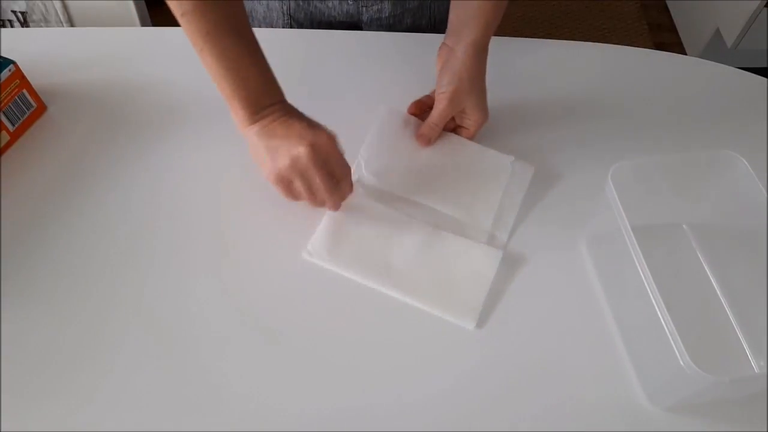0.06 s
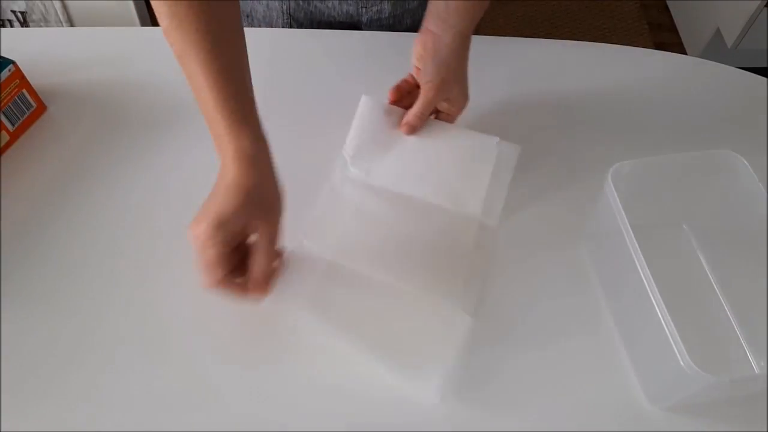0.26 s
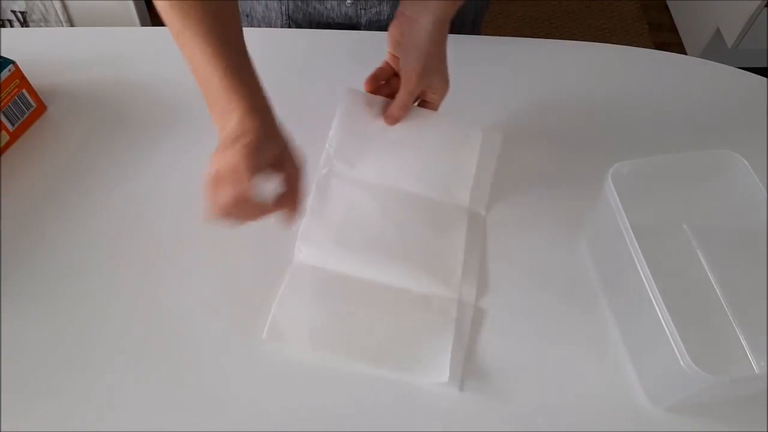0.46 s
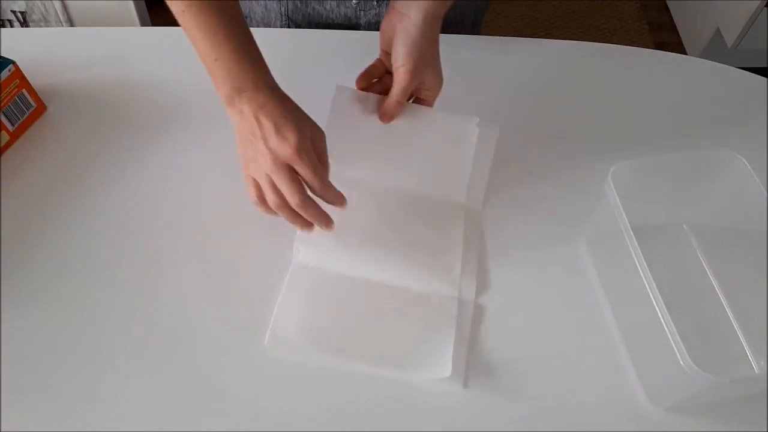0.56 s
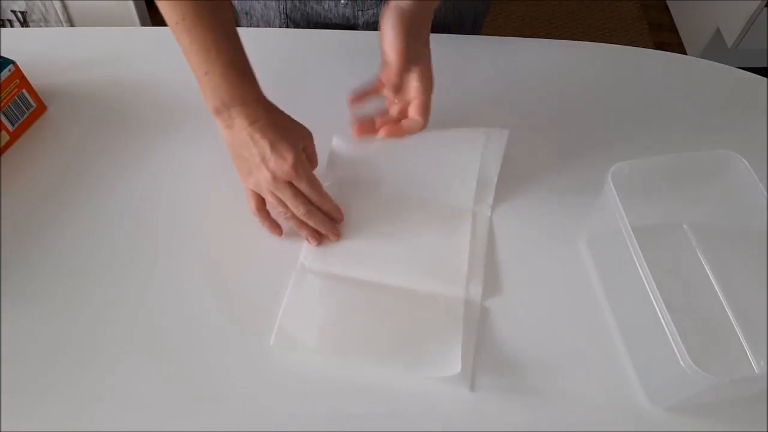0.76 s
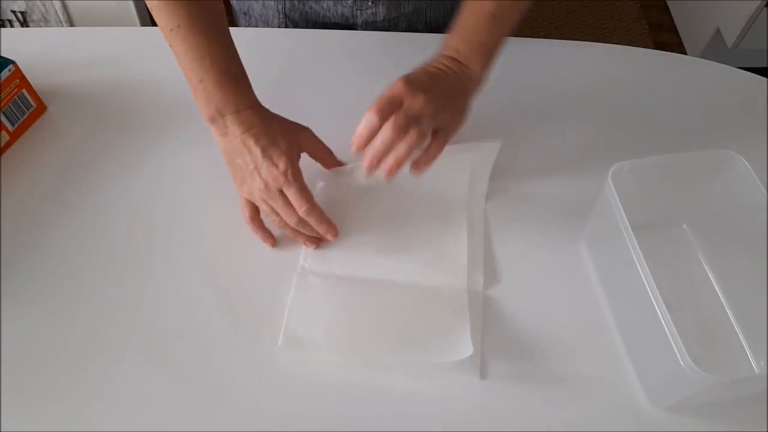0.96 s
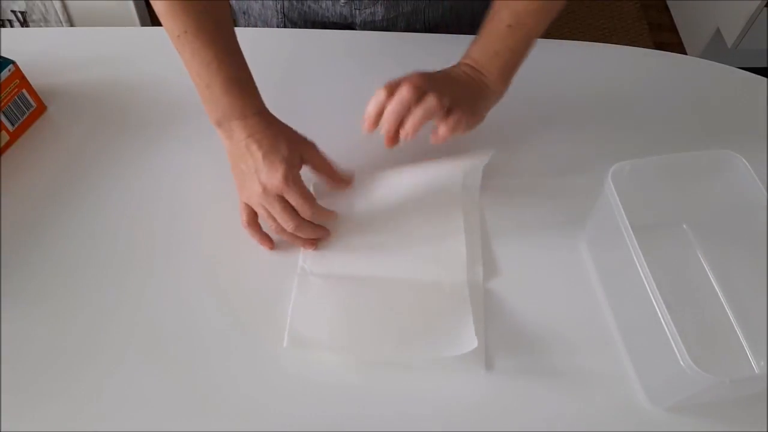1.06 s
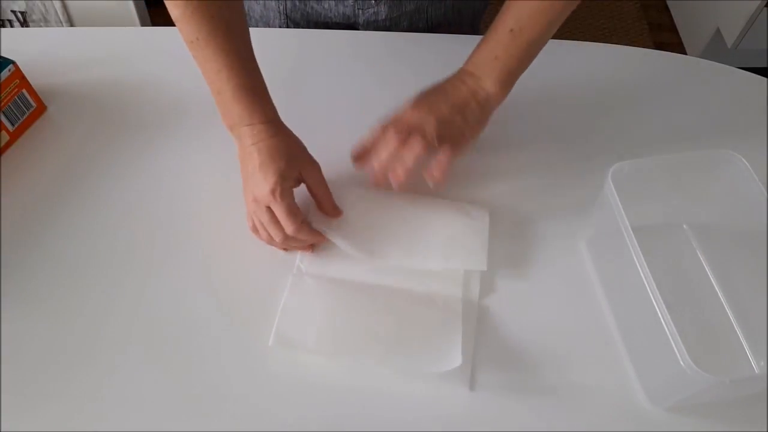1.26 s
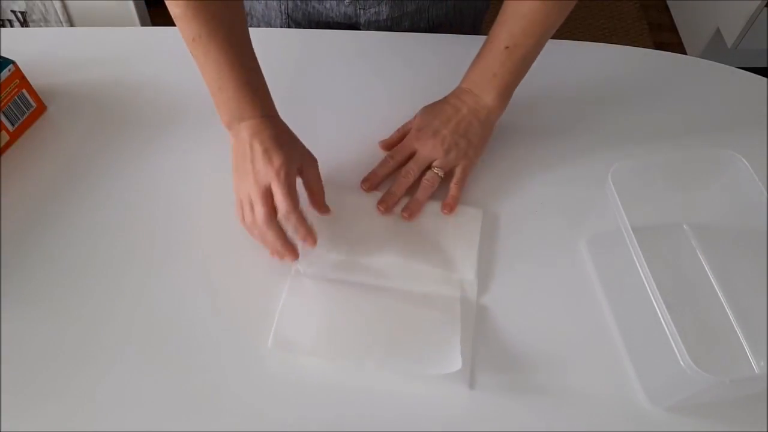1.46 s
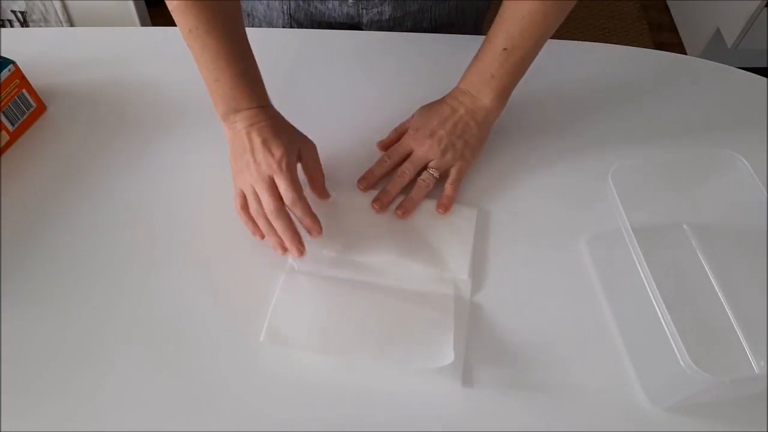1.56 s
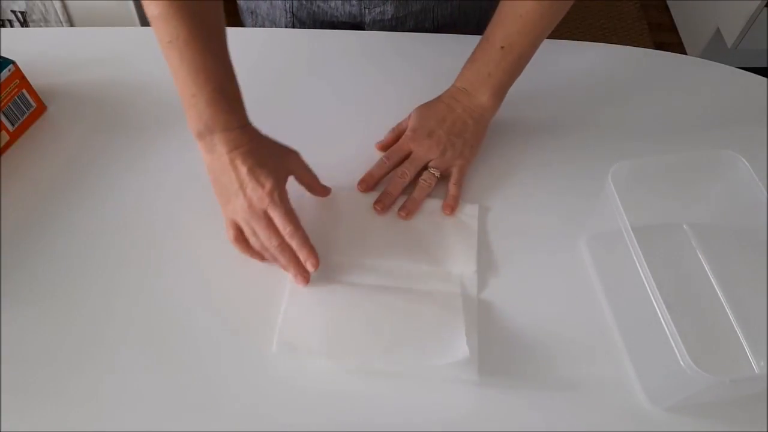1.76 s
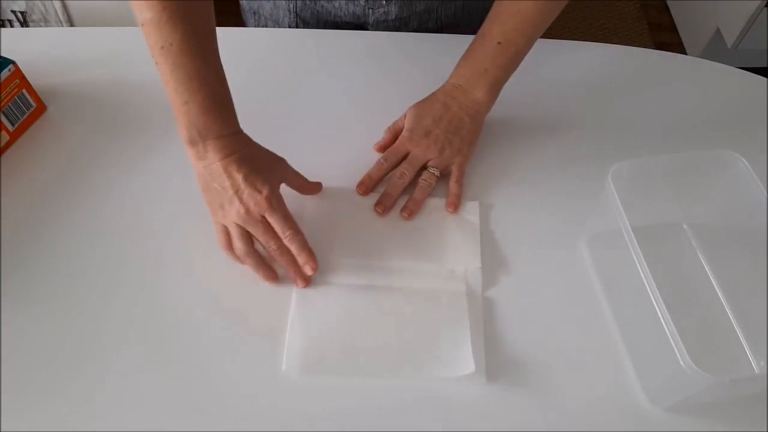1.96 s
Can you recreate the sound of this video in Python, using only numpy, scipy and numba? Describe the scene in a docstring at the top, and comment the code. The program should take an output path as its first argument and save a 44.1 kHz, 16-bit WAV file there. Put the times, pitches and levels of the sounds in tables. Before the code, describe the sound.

Stiff baking paper is handled on a table, close up in a small hard room. Faint crackle begins, with a crisp rustle and sharp ticks at 0.2 s. At 0.43 s the sheet snaps with one loud, dry pop and a short tail. After a lull, rustling resumes at 0.66 s, with creasing ticks, a light swish near 1.25 s and smoothing, thinning out by 2 s. Low hum and faint hiss continue beneath.

```python
"""Handling of stiff baking paper

Hands fold and smooth a sheet on a table, under a phone with two microphone ports.
Dense micro-buckles, drawn as random clicks, excite the sheet's broad, shifting resonance.
Single creases tick as noise bursts, a sliding flap swishes, and the sheet pops once as a sum of decaying modes;
one more noise burst is the pop's echo.
A small hard room answers with a diffuse noise tail, over filtered noise: a low hum in the room's modes and a hiss."""
import sys
import numpy as np
from scipy import signal
from scipy.fft import rfft, irfft
from scipy.io import wavfile
from scipy.ndimage import uniform_filter1d
from numba import njit

SR = 44100
rng = np.random.default_rng(int(sys.argv[2]) if len(sys.argv) > 2 else 0)


def ratio_of_db(decibels):
    """Turn decibels (scalar or array-like) into linear amplitude factors; 0 dB maps to 1."""
    return 10 ** (np.asarray(decibels, float) / 20)


def waveform_to_disk(signal):
    """Save audio, clipped to [-1, 1], as 16-bit WAV at the path in sys.argv[1]."""
    frames = np.transpose(np.atleast_2d(signal))
    scaled = np.clip(frames, -1, 1) * 32767
    samples = np.round(scaled).astype(np.int16)
    wavfile.write(sys.argv[1], SR, samples)


N = 88200

# Handling of the sheet before and after the pop:
# (time [s], level of the sheet's body [dB], resonance of the bent sheet [Hz],
#  crispness relative to the body [dB], free flap relative to the body [dB])
HANDLING_BEFORE_POP = [(0.0, -61.5, 2660, 6.5, -12), (0.049, -55, 2330, -3, -6),
                       (0.128, -65.5, 3070, 1.5, -11), (0.194, -53.5, 2800, 0, -7),
                       (0.201, -36.5, 2650, -4, -11), (0.222, -46.5, 2360, 1.5, -9),
                       (0.328, -51, 1920, -2, -8), (0.338, -43.5, 2050, -1.5, -5.5),
                       (0.415, -51, 2020, -4.5, -20)]
HANDLING_AFTER_POP = [(0.655, -87, 2210, -13, -3), (0.662, -41.5, 2220, -5, -8.5),
                      (0.703, -42.5, 2250, -7, -9.5), (0.727, -37.5, 2100, -5, -13.5),
                      (0.795, -44.5, 2480, -6, -12.5), (0.82, -53.5, 2520, 0.5, -4.5),
                      (0.91, -49, 1900, -10, -10), (0.953, -46.5, 2100, -5, -9),
                      (1.012, -56.5, 1930, -3, -3.5), (1.021, -44.5, 2140, -4.5, -5),
                      (1.059, -48, 2620, -7.5, -11), (1.119, -54.5, 2570, -8, -11),
                      (1.13, -44, 2060, -5, -3.5), (1.152, -46.5, 1620, -3.5, -7),
                      (1.16, -39.5, 1510, -6, -0.5), (1.18, -50, 1600, -4.5, -3),
                      (1.2, -40.5, 2400, -15, -20), (1.231, -40, 2490, -11, -18),
                      (1.288, -42.5, 2270, -8, -10), (1.326, -55.5, 1970, -3, -14),
                      (1.375, -53.5, 2200, 1.5, -7), (1.379, -45, 2570, 4.5, -4),
                      (1.393, -44, 1870, -6, -8.5), (1.441, -40, 2360, -7, -15.5),
                      (1.489, -55.5, 2550, 1, -13), (1.545, -44, 2370, -14, -32),
                      (1.585, -42.5, 2340, -16.5, -34), (1.625, -59, 2500, -4, -17),
                      (1.665, -69, 2700, 0, -17), (1.691, -41.5, 2570, -9.5, -19.5),
                      (1.733, -47, 2070, -10, -15.5), (1.882, -70.5, 2370, -1.5, -11),
                      (1.925, -49.5, 2420, -13, -27), (1.953, -62, 2430, 3.5, -15),
                      (2.0, -62, 2660, -9, -12)]
# Broad body around the resonance: (frequency [Hz], relative level [dB])
BROAD_BODY = [(900, -15), (1500, 3.5), (2200, 10), (4000, 9), (6500, -9.5), (10000, -9.5), (16000, -49)]
# Treble of crisp paper: (frequency [Hz], relative level [dB])
CRISP_TREBLE = [(2500, -15), (4500, 13), (6000, 10), (8000, 12.5), (10000, 6.5), (12500, 8), (15000, 0),
                (16500, -22)]
# Rustle from far corners, unlike at the two ports: (frequency [Hz], gain [dB])
CORNER_GAIN = [(1500, -7), (5000, 0)]
# Modes of the sheet as it snaps through: (frequency [Hz], relative level [dB], decay by 60 dB [s])
SNAP_MODES = [(1020, -16, 0.017), (1755, -14.5, 0.0057), (2160, -11.5, 0.021), (3360, -11.5, 0.0032),
              (5000, -26, 0.00089), (8000, -32, 0.001), (10400, -8, 0.0012)]
# Creases that snap, and the pop's echo at 0.4335 s: (time [s], level of the ring's peak [dB], pitch [Hz])
TICK_BURSTS = [(0.0504, -35, 8000), (0.0727, -31, 6900), (0.1564, -28.5, 10000), (0.2005, -21.5, 9100),
               (0.199, -32, 3700), (0.205, -18.5, 8550), (.2050, -17, 12300), (.2060, -16, 11100),
               (0.339, -30, 6800), (.372, -33, 9500), (.4335, -20, 1450), (.684, -30, 10000),
               (0.71, -30, 9100), (0.741, -32, 7200), (.8545, -41, 11000), (0.9557, -28.5, 7960),
               (1.131, -35, 6700), (1.156, -30.5, 4060), (1.2481, -23.5, 11600), (1.3637, -31, 9500),
               (1.3775, -29, 4100), (1.4458, -27, 3430), (1.515, -30, 6000), (1.525, -30, 4360),
               (1.6274, -35, 6000), (1.6829, -28, 8300), (1.688, -34.5, 4500), (1.8010, -37.5, 7200),
               (1.9211, -31, 2160), (1.923, -33, 5000)]
# Balance as the work moves over the table: (time [s], left minus right [dB])
TABLE_PAN = [(0, 0.5), (1.2, 1), (2, 1.5)]
# Reverberation time of the room: (frequency [Hz], decay by 60 dB [s])
REVERBERATION = [(200, 0.81), (1000, 0.33), (2500, 0.52), (6000, 0.16), (14000, 0.27)]
# Room modes that carry the hum: (frequency [Hz], bandwidth [Hz], relative density [dB per Hz])
HUM_MODES = [(71, 9.3, -3), (98.3, 14.5, -1.5), (115.2, 7.2, 4), (147.6, 30.4, 1.5), (225.4, 19.8, -4.5),
             (289, 22.4, -16.5), (356.7, 27, -15)]
# Spectrum of the room noise: (frequency [Hz], relative density [dB per Hz])
AIR_SPECTRUM = [(20, -9), (45, -12), (100, -5), (300, -5), (600, -15.5), (1500, -37), (4000, -23.5),
                (9000, -30), (16000, -58)]

POP_S = 0.4253
HELD_LOW_HZ = 1450  # paper pressed to the table is quiet below this


def level(x, db):
    """Normalization: the rms value of x is set to db."""
    return x * ratio_of_db(db) / np.sqrt(np.mean(x ** 2))


def highpass(x, order, hz):
    """Butterworth response: maximally flat above the cutoff."""
    return signal.sosfilt(signal.butter(order, hz, "high", fs=SR, output="sos"), x)


def colour(x, points):
    """Linear filtering: the spectrum is multiplied by a curve of (Hz, dB), straight over log frequency."""
    hz, db = np.array(points, float).T
    f = np.maximum(np.fft.rfftfreq(x.shape[-1], 1 / SR), 1)
    gain = ratio_of_db(np.interp(np.log(f), np.log(hz), db))
    return irfft(rfft(x) * gain, x.shape[-1])


@njit
def svf(x, hz, width):
    """State-variable resonator: a band-pass with a moving centre; width is a share of the centre."""
    y, b, l = np.empty(len(x)), 0., 0.
    for i in range(len(x)):
        g = np.tan(np.pi * hz[i] / SR)
        v = (b + g * (x[i] - l)) / (1 + g * (g + width))
        b, l, y[i] = 2 * v - b, l + 2 * g * v, width * v
    return y


def resonate(x, hz, width):
    """Cascaded resonance: two equal band-passes in series, each of the given width."""
    centre = np.full(len(x), hz, float)
    return svf(svf(x, centre, width), centre, width)


def walk(rate):
    """Slow random modulation: levels held for 1 / rate seconds and slewed, with a spread near 1."""
    hold = int(SR / rate)
    steps = np.repeat(rng.standard_normal(N // hold + 1), hold)
    return 1.3 * uniform_filter1d(uniform_filter1d(steps, hold), hold)[:N]


def buckles():
    """Impulsive excitation: micro-buckles are random clicks of uneven size, in flurries over fine noise."""
    per_s, mean_db, top_db = 4000, 3.2, 13
    flutter_db, flutter_per_s = 2.5, 140
    hit = rng.random(N) < per_s / SR
    size_db = np.minimum(mean_db * rng.exponential(size=N), top_db)
    sign = np.sign(rng.standard_normal(N))
    grains = hit * ratio_of_db(size_db) * sign + 0.28 * rng.standard_normal(N)
    return grains * ratio_of_db(flutter_db * walk(flutter_per_s))


def rustle():
    """Forced resonance: buckles ring the bent sheet; crisp paper adds treble, loose paper a lower flap."""
    sheet_width, broad_db = 0.93, -9
    panel_width, panel_drift, panel_db = 0.09, 0.15, -3
    flap_hz, flap_width = 1154, 1.0  # low ring of the sheet where no hand holds it down
    settle_db, settle_t60_s = -37.5, 0.42
    t = np.arange(N) / SR
    s, db, hz, crisp_db, flap_db = np.array(HANDLING_BEFORE_POP + HANDLING_AFTER_POP, float).T
    centre = np.clip(np.interp(t, s, hz), 300, 8000)
    clicks = buckles()

    ring = resonate(clicks, centre, sheet_width) / np.sqrt(centre)
    body = level(ring, 0) + level(colour(buckles(), BROAD_BODY), broad_db)
    panels = np.zeros(N)
    for share in (0.866, 1.168):  # pitch of each small panel as a share of the resonance
        panel_hz = share * centre * np.exp(panel_drift * walk(29.89))
        panels += svf(clicks, panel_hz, panel_width)
    body = level(highpass(body + level(panels, panel_db), 4, HELD_LOW_HZ), 0)

    top = level(colour(clicks + buckles(), CRISP_TREBLE), 0) * ratio_of_db(np.interp(t, s, crisp_db))
    flap = level(resonate(clicks, flap_hz, flap_width), 0) * ratio_of_db(np.interp(t, s, flap_db))

    # between the two spells of handling the sheet shivers out after the pop
    last_s, last_db = HANDLING_BEFORE_POP[-1][:2]
    let_go = (t > last_s) & (t < HANDLING_AFTER_POP[0][0])
    shiver_db = np.where(t > POP_S, settle_db - 60 * (t - POP_S) / settle_t60_s, last_db)
    return (body + top + flap) * ratio_of_db(np.where(let_go, shiver_db, np.interp(t, s, db)))


def snap_ring(t):
    """Modal superposition: a short push swells up to t = 0, then each mode decays exponentially."""
    push_s = 0.00007
    u = np.maximum(t, 0)
    modes = np.zeros(len(t))
    for hz, db, t60 in SNAP_MODES:
        modes += ratio_of_db(db) * np.cos(2 * np.pi * hz * u) * np.exp(-np.log(1000) * u / t60)
    return modes * np.exp(-0.5 * (np.minimum(t, 0) / push_s) ** 2)


def pop():
    """Snap-through instability: the sheet flips and rings its modes, again off the table, which thumps."""
    pop_db, bounce_s, bounce_db = -6.5, 0.00165, -6
    thump_hz, thump_db, thump_s = 294, -23.5, 0.0012  # the table takes the push
    t = np.arange(N) / SR - POP_S
    sheet = snap_ring(t) + ratio_of_db(bounce_db) * snap_ring(t - bounce_s)
    sheet = highpass(sheet, 3, 950)  # a small sheet radiates little below this
    u = np.maximum(t, 0)
    thump = ratio_of_db(thump_db) * np.sin(2 * np.pi * thump_hz * u) * np.exp(-u / thump_s)
    return ratio_of_db(pop_db) * (sheet / np.abs(sheet).max() + thump)


def ticks():
    """Transient response: each crease, and the pop's echo, is a millisecond noise burst ringing at its pitch."""
    time_scale_s, width, broad_db = 0.0007, 0.7, -6
    out, t = np.zeros(N), np.arange(256) / SR
    for s, db, hz in TICK_BURSTS:
        noise = rng.standard_normal(len(t))
        burst = noise * t / time_scale_s * np.exp(-t / time_scale_s * 2)
        ring = resonate(burst, min(hz, 15000), width)
        tick = ring / np.abs(ring).max() + ratio_of_db(broad_db) * burst / np.abs(burst).max()
        tick = highpass(tick, 4, min(0.81 * hz, HELD_LOW_HZ))
        start = int(s * SR)
        out[start:start + len(t)] += tick * ratio_of_db(db)
    return out


def swish():
    """Sliding friction: the flap slides shut over the sheet, its grains in a band that follows the speed."""
    peak_s, spread_s = 1.252, 0.035
    swish_db, low_hz, top_hz, width = -42.5, 3230, 6000, 0.42
    speed = np.exp(-0.5 * ((np.arange(N) / SR - peak_s) / spread_s) ** 2)
    hz = low_hz + (top_hz - low_hz) * speed
    return level(resonate(buckles(), hz, width), swish_db) * speed


def ports(x, pan_db, unlike=0):
    """Path difference: the left port hears the table earlier; unlike has opposite signs at the two."""
    lag_s, most_rad = 0.00005, 1.85  # the case limits the phase gap in the treble
    turn = np.minimum(2 * np.pi * np.fft.rfftfreq(N, 1 / SR) * lag_s, most_rad)
    late = irfft(rfft(x - unlike) * np.exp(-1j * turn), N)
    return np.array([(x + unlike) * ratio_of_db(pan_db / 2), late * ratio_of_db(-pan_db / 2)])


def room(x):
    """Diffuse reverberation: noise bands decay at their own rates, less alike at the ports in the treble."""
    build_up_s = 0.0097
    t = np.arange(SR // 2) / SR
    hz, t60 = np.array(REVERBERATION, float).T
    tail = np.zeros((2, len(t)))
    for f in 150 * 2 ** np.arange(0, 7, 0.5):
        noise = rng.standard_normal((3, len(t)))
        unlike = np.clip(f / 2500, 0.35, 0.95)
        pair = np.sqrt(1 - unlike) * noise[0] + np.sqrt(unlike) * noise[1:]
        band = np.array([svf(v, np.full(len(t), f), 0.41) for v in pair])
        band_t60 = np.interp(np.log(f), np.log(hz), t60)
        tail += band * np.exp(-np.log(1000) * t / band_t60)
    tail *= np.clip(t / build_up_s, 0, 1) ** 2
    tail /= np.sqrt(np.sum(tail ** 2) / 2)
    return signal.fftconvolve(x[None], tail, axes=1)[:, :N]


def mode_noise():
    """Modal filtering: each room mode passes a narrow band of noise, which swells and sinks."""
    out = np.zeros(N)
    for f, width_hz, db in HUM_MODES:
        # 1.23 widens each stage so that the pair passes about the tabled bandwidth
        band = resonate(rng.standard_normal(N), f, 1.23 * width_hz / f)
        out += level(band, db + 10 * np.log10(width_hz)) * ratio_of_db(1.2 * walk(4.0))
    return out


def hum():
    """Modal room response: low noise, probably an appliance, nearly alike at both ports."""
    hum_db, side_db = -52, -24  # side: relative to the shared part, opposite in sign at the ports
    return level(mode_noise(), hum_db) + level(mode_noise(), hum_db + side_db) * np.array([[1], [-1]])


def air():
    """Stationary random noise: a faint broad hiss, partly shared by the ports."""
    noise = rng.standard_normal((3, N))
    return level(colour(noise[0] + 1.3 * noise[1:], AIR_SPECTRUM), -59.5)


def scene():
    """Superposition: direct sound, room tail and background add at each port."""
    paper, corners, bursts, snap = rustle() + swish(), rustle(), ticks(), pop()
    wet = room(ratio_of_db(-9) * paper + ratio_of_db(-12) * bursts + ratio_of_db(-8.5) * snap)
    pan_db = np.interp(np.arange(N) / SR, *np.array(TABLE_PAN, float).T)
    handled = ports(paper + bursts, pan_db, colour(corners, CORNER_GAIN))
    return handled + ports(snap, -1) + wet + hum() + air()


def band_limit(x):
    """A steep low-pass at the top of the band."""
    return signal.sosfilt(signal.butter(12, 16720, fs=SR, output="sos"), x)


def record(dry):
    """High-pass response of a microphone: the deep bass is dropped."""
    finished = highpass(dry, 2, 35.2)
    return band_limit(finished)


dry = scene()
out = record(dry)
waveform_to_disk(out)
```